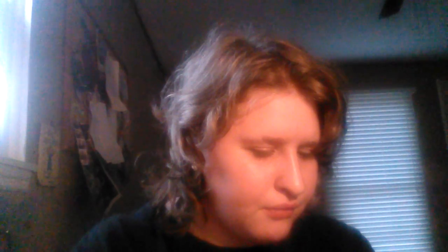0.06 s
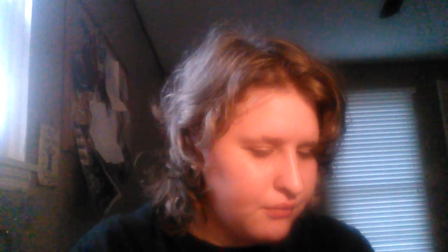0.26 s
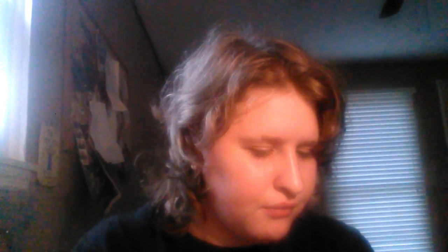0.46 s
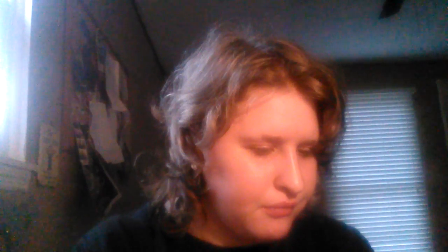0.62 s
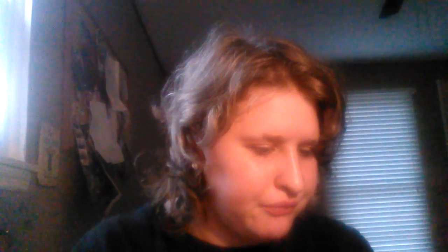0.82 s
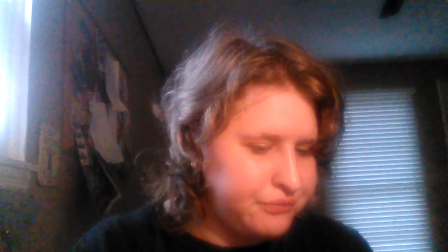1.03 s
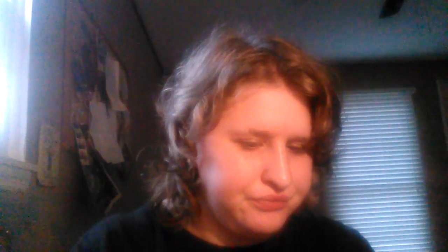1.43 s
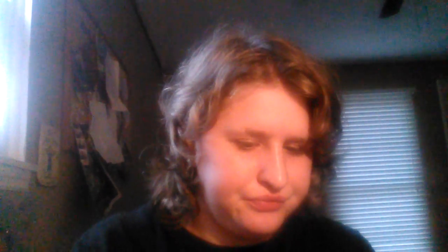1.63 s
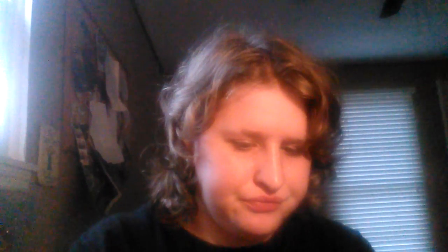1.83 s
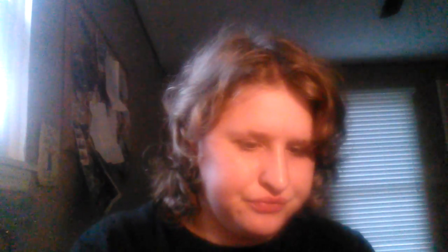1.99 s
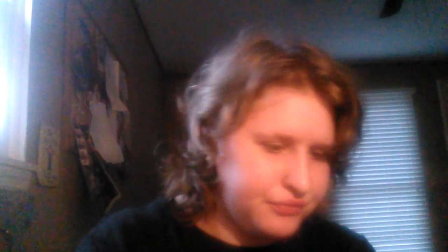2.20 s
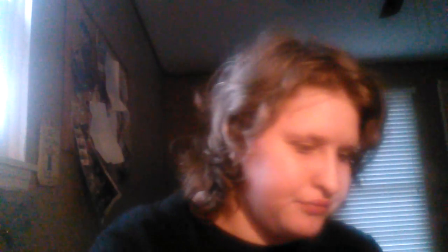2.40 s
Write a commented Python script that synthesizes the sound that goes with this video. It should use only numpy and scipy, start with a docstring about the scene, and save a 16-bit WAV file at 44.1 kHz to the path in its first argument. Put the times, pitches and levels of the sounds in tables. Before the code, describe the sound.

One sharp, hollow plastic bottle knock and a few light clicks in a quiet room.

```python
"""A sharp, hollow knock, then a few small clicks: a plastic pill bottle set down hard, and its cap. The base
hits the surface in three quick contacts that ring the bottle and set a small, quiet room ringing; each click
rings the cap's high modes. Just after the knock the bottle settles with two low thumps, and faint handling
scuffs come before and after. Underneath lie a low drone that slowly sinks in pitch, like a distant engine, dull
room noise and a soft, swelling hiss."""
import sys
import numpy as np
from scipy import signal
from scipy.fft import rfft, irfft, next_fast_len
from scipy.io import wavfile
from scipy.ndimage import map_coordinates

SR = 44100
rng = np.random.default_rng(int(sys.argv[2]) if len(sys.argv) > 2 else 0)


def digitize_waveform(pressure):
    """Quantize a signal to 16-bit integers and store it at the path in sys.argv[1].

    Rows of a 2-D input are taken as channels; values are limited to [-1, 1].
    """
    field = np.atleast_2d(pressure).T
    bounded = np.clip(field, -1, 1)
    quanta = np.round(bounded * 32767).astype(np.int16)
    wavfile.write(sys.argv[1], SR, quanta)


N = 112454
TIME = np.arange(N) / SR

# contacts as the base rocks flat: t/s, level/dB, contact time/s
CONTACTS = [(1.4760, 0, 0.00032), (1.4773, 5, 0.00015), (1.4790, 0, 0.002)]


def bottle_knock():
    """Each contact cracks and rings the bottle; longer ones are duller. The small body gives little bass."""
    # bottle on the surface: f/Hz, level/dB, t60/s
    body_modes = [(260, -45.5, .025), (505, -10, 0.02), (870, -13, 0.024), (1300, -8, .01),
                  (1672, 1.5, 0.0065), (1960, -9, .008), (2750, -18, 0.014), (3400, -22, .014),
                  (4740, -30.5, .012), (8030, -28, .018), (9520, -26.5, .008), (11100, -32, .008),
                  (13450, -45, 0.079), (13920, -41, 0.1)]
    # colour of the crack: f/Hz, level/dB
    crack_colour = [(500, -0.5), (3000, 4), (5500, -9), (7000, 4), (10000, -2.5), (12500, -11),
                    (16000, -12)]
    out = np.zeros(N)
    for start, db, contact_s in CONTACTS:
        blow = ring(body_modes) + amp(-22) * burst(crack_colour, t60=.014)
        blow *= attack(rise_s=.00033)
        pole = np.exp(-2 * np.pi / (contact_s * SR))
        softened = signal.lfilter([1 - pole], [1, -pole], blow)
        out += amp(db) * delayed(softened, start)
    return high_pass(out, hz=220, order=1)


def knock_reverb():
    """The room answers the knock with a diffuse wash and ringing standing waves."""
    # colour of the wash: f/Hz, level/dB
    wash_colour = [(100, -16), (200, -1.5), (380, -5), (500, 1), (850, 1), (1100, -5), (1500, -0.5),
                   (2200, -9.5), (3000, -18), (3600, -21.5), (5000, -30), (8300, -31), (10500, -44),
                   (16000, -52.5)]
    # decay of the wash: f/Hz, t60/s
    wash_decay = [(150, 0.46), (500, 0.34), (1500, 0.42), (4000, 0.33), (8000, 0.5), (15000, 0.24)]
    # standing waves: f/Hz, level/dB, t60/s
    room_modes = [(134, -30, .5), (168, -33, .35), (217, -23, .48), (257, -33, .45), (297, -35, .4),
                  (327, -30, .33), (445, -33, .4), (465, -31, .4), (487, -31, .38), (514, -27, .42),
                  (770, -30, .35), (842, -30, .33), (921, -28, .33), (1352, -29, .3), (1642, -31, .4)]
    wash = amp(-18.5) * room_tail(noise(wash_colour), wash_decay)
    ringing = attack(rise_s=.01) * ring(room_modes)
    return delayed(wash + ringing, CONTACTS[0][0])


def cap_clicks():
    """Each click snaps and rings the cap's modes in its own balance, with a short room tail."""
    # clicks: t/s, level/dB, low gain/dB, mid gain/dB, top gain/dB, low cut/Hz, rise/s
    clicks = [(1.5376, -28.5, 2, -8, -9, 1986, .001), (1.7299, -27, -0.5, -3.5, 12.5, 1200, .0002),
              (1.7380, -35, -16, -15, -6.5, 2020, .001), (1.7634, -41.5, 8, 6.5, -6, 1200, .001),
              (1.8817, -28, -13.5, 1.5, -2, 3480, .0003), (1.9192, -37, -10, -17, -8, 3466, .001)]
    # cap resonances: f/Hz, level/dB, t60/s
    cap_modes = [(1555, -10.5, 0.023), (3473, -6.5, 0.03), (3820, -8, 0.021), (4830, -10, 0.016),
                 (5190, -7.5, .025), (8160, -8.5, 0.023), (8450, -2.5, 0.018), (9180, -2.5, 0.0092),
                 (10000, -4, 0.0089), (11600, -4, 0.0052), (12220, 2.5, 0.0076), (13400, -8, 0.0064),
                 (15180, -8, .007), (15600, -4, .01)]
    # decay of the tail: f/Hz, t60/s
    tail_decay = [(3500, .27), (8000, .24), (13000, .2)]
    # the room returns less of the top: f/Hz, level/dB
    tail_colour = [(3000, 1), (8500, -2.5), (12000, -6), (16000, -5)]
    out = np.zeros(N)
    for start, db, low_db, mid_db, top_db, cut_hz, rise_s in clicks:
        balance = [(3800, low_db), (5000, mid_db), (8000, 0), (10000, 0), (12000, top_db)]
        modes = [(hz, level + along(balance, hz), t60) for hz, level, t60 in cap_modes]
        click = ring(modes, flutter_rad=.7) + amp(-4.5) * burst(balance, t60=.009)
        click = high_pass(click * attack(rise_s), cut_hz, order=4)
        room = room_tail(rng.standard_normal(N), tail_decay)
        tail = signal.fftconvolve(click, room / np.linalg.norm(room))[:N]
        out += amp(db) * delayed(click + amp(-8) * equalised(tail, tail_colour), start)
    return out


def scuffs_and_thumps():
    """Faint nudges and scuffs, and the low thumps of the bottle settling: noise in one resonance that rises and
    dies away."""
    # touches and settling thumps: t/s, level/dB, f/Hz, bandwidth/Hz, rise/s
    touches = [(.18, -52, 510, 126, 0.03), (1.039, -53.5, 487, 219, 0.02),
               (1.143, -60.5, 6600, 1500, 0.007), (1.532, -32.5, 161, 120, 0.003),
               (1.731, -46, 336, 118, 0.0073), (2.195, -57, 1190, 1096, 0.011),
               (2.348, -53.5, 507, 110.3, 0.014)]
    out = np.zeros(N)
    for start, db, centre_hz, width_hz, rise_s in touches:
        band = filtered(rng.standard_normal(N), lambda hz: 1 / (1 + (2 * (hz - centre_hz) / width_hz) ** 2))
        swell = TIME / rise_s * np.exp(1 - TIME / rise_s)
        out += amp(db) * delayed(unit(band) * swell, start)
    return out


def drone():
    """A low, wavering tone sinks in pitch while two weaker hums swell and fade."""
    # path of the tone: t/s, f/Hz, level/dB
    glide = [(0.0, 62.8, -40), (0.16, 62, -33.5), (0.25, 61.98, -29.5), (0.7, 62.13, -26),
             (1.06, 59.75, -28), (1.16, 59.2, -32.5), (1.34, 58.76, -26.5), (1.52, 58.41, -31),
             (2.37, 54.14, -38), (2.45, 55.34, -53.5), (2.55, 55.4, -45.5)]
    # steadier hums: f/Hz, level/dB, swell centre/s, fall-off/(dB/s^2)
    hums = [(93, -40, 1.6, 2), (139, -47, .95, 7)]
    hz, db = curves(glide)
    out = amp(db + .5 * wobble(14)) * np.sin(2 * np.pi * np.cumsum(hz) / SR)
    follow_db = .59 * (db - db.max())  # the hums share part of the tone's level swings
    for hum_hz, hum_db, centre_s, fall_db in hums:
        swell = amp(hum_db + follow_db - fall_db * (TIME - centre_s) ** 2)
        out += swell * np.sin(2 * np.pi * hum_hz * TIME + .5 * wobble(5.69))
    return np.sqrt(2) * out


def room_tone():
    """Dull room noise and a soft hiss that swells around the handling."""
    # colours of the dull noise and the hiss: f/Hz, level/dB
    air_colour = [(20, 3), (45, 1), (80, 4), (120, -8.5), (200, -17), (350, -21.5), (500, -25), (900, -28),
                  (1300, -37), (2400, -37.5), (4500, -45), (15500, -47.5)]
    hiss_colour = [(1000, -29), (3500, -6.5), (4800, -9.5), (6500, -5), (8300, 0.5), (10000, -4.5),
                   (12500, -6), (15500, -10.5)]
    # their envelopes: t/s, level/dB
    air_envelope = [(0, -39.5), (.9, -39), (1.4, -37), (2.0, -42.5), (2.38, -43.5), (2.55, -47)]
    hiss_envelope = [(0, -71), (.92, -75.5), (1.02, -63.5), (1.21, -69), (1.29, -60.5), (1.45, -65),
                     (1.62, -55.5), (1.9, -59), (2.17, -61), (2.3, -64.5), (2.38, -62), (2.46, -68),
                     (2.55, -67)]
    air = amp(curves(air_envelope)[0]) * noise(air_colour)
    hiss = amp(curves(hiss_envelope)[0] + .7 * wobble(25)) * noise(hiss_colour)
    return air + hiss


def ring(modes, flutter_rad=0):
    """Struck modes: damped sines that start together, roughened by optional phase flutter."""
    t = TIME[:SR // 2]
    out = np.zeros(N)
    for hz, db, t60 in modes:
        flutter = flutter_rad * np.interp(t, np.arange(400) / 800, rng.standard_normal(400))
        out[:len(t)] += amp(db) * fade(t, t60) * np.sin(2 * np.pi * hz * t + flutter)
    return out


def burst(colour, t60):
    """A short crack of coloured noise."""
    return equalised(rng.standard_normal(N), colour) * fade(TIME, t60)


def room_tail(x, decay):
    """Noise x builds up quickly, then each frequency dies at its own speed."""
    hz, t, spectrum = signal.stft(x, SR, nperseg=256)
    tail = signal.istft(spectrum * fade(t, along(decay, hz)[:, None]), SR)[1][:N]
    return delayed(tail * attack(rise_s=.001), seconds=.002)


def noise(colour):
    """Coloured noise of rms 1."""
    return unit(equalised(rng.standard_normal(N), colour))


def wobble(rate):
    """A smooth random curve, rate knots a second."""
    return map_coordinates(rng.standard_normal(N), [TIME * rate])


def amp(db):
    return 10 ** (np.asarray(db) / 20)


def unit(x):
    return x / np.sqrt(np.mean(x ** 2) + 1e-20)


def attack(rise_s):
    return 1 - np.exp(-TIME / rise_s)


def fade(t, t60):
    return np.exp(-np.log(1000) * t / t60)


def delayed(x, seconds):
    return np.pad(x, (max(round(seconds * SR), 0), 0))[:N]


def along(points, hz):
    """Read (f/Hz, value) points at hz, on a log axis."""
    freqs, values = np.transpose(points)
    return np.interp(np.log(hz + 1), np.log(freqs + 1), values)


def curves(rows):
    """One per-sample curve for each column after the time."""
    times, *columns = np.transpose(rows)
    return [np.interp(TIME, times, column) for column in columns]


def filtered(x, response):
    """Shape x with a gain that depends on frequency."""
    size = next_fast_len(N + SR // 2)
    return irfft(rfft(x, size) * response(np.fft.rfftfreq(size, 1 / SR)), size)[:N]


def equalised(x, colour):
    """EQ x through (f/Hz, level/dB) points."""
    return filtered(x, lambda hz: amp(along(colour, hz)))


def high_pass(x, hz, order):
    return signal.sosfilt(signal.butter(order, hz, 'high', fs=SR, output='sos'), x)


def scene():
    """Mono mix of the bottle and its room over the background bed."""
    return (bottle_knock() + knock_reverb() + cap_clicks() + scuffs_and_thumps() + drone() + room_tone())[None]


def record(dry):
    """The microphone rounds off the highest peaks and keeps nothing above its band limit."""
    top_hz = 15850
    rounded = dry[0] / (1 + np.abs(dry[0]) ** 8) ** (1 / 8)
    return filtered(rounded, lambda hz: 1 / (1 + (hz / top_hz) ** 200))[None]


dry = scene()
out = record(dry)
digitize_waveform(out)
```